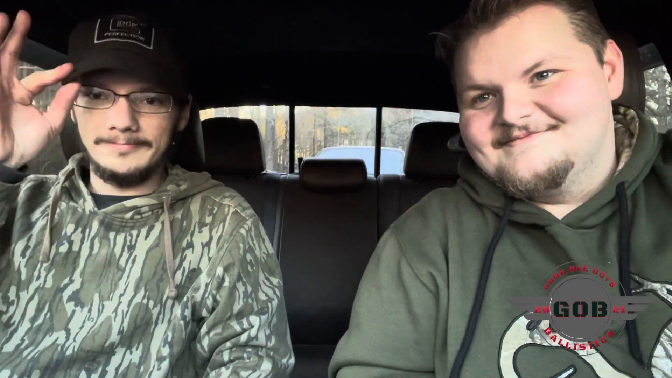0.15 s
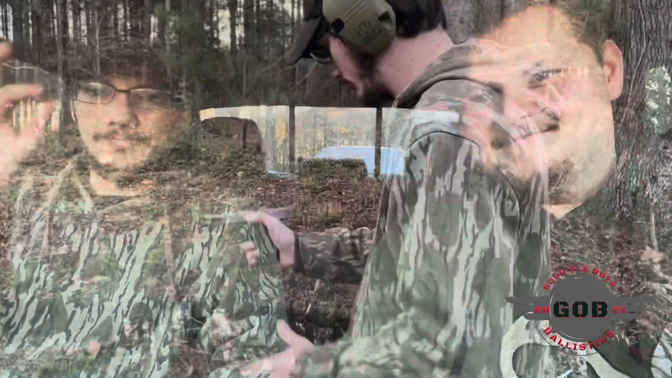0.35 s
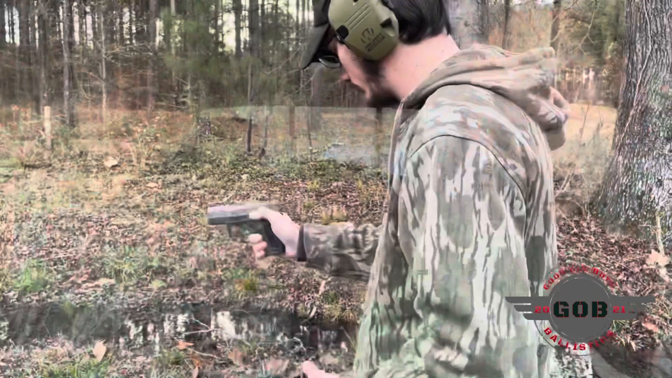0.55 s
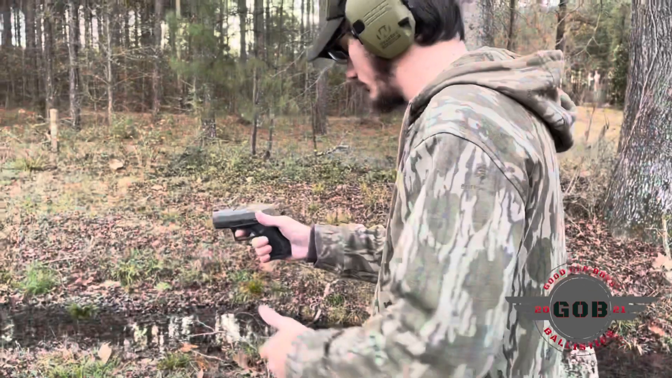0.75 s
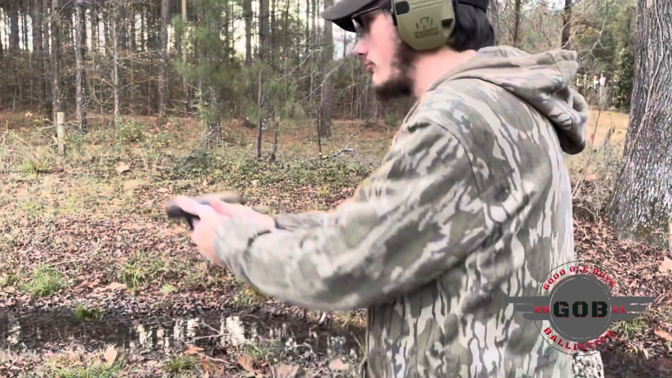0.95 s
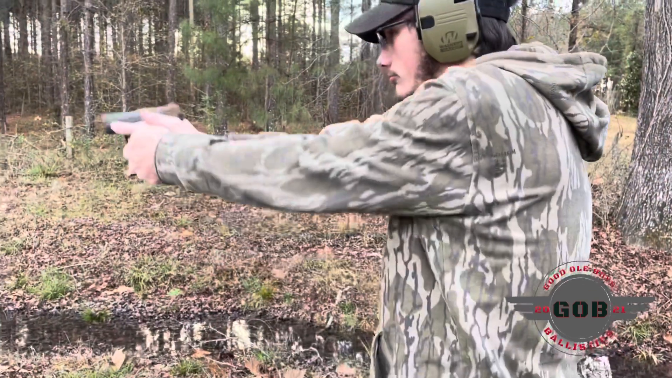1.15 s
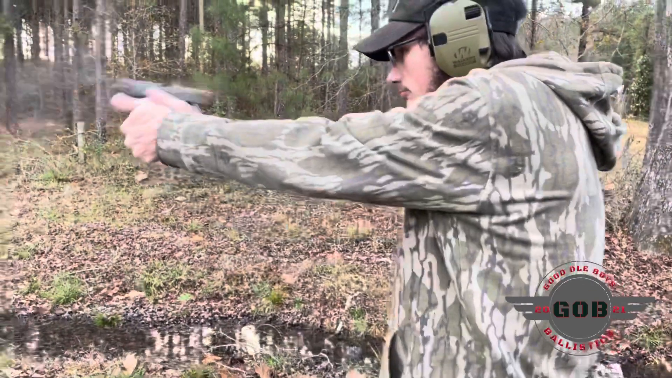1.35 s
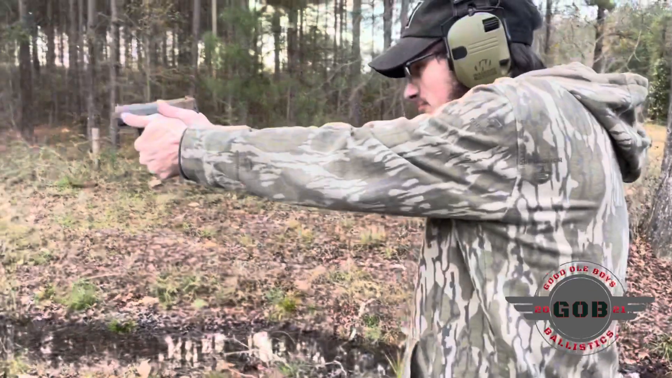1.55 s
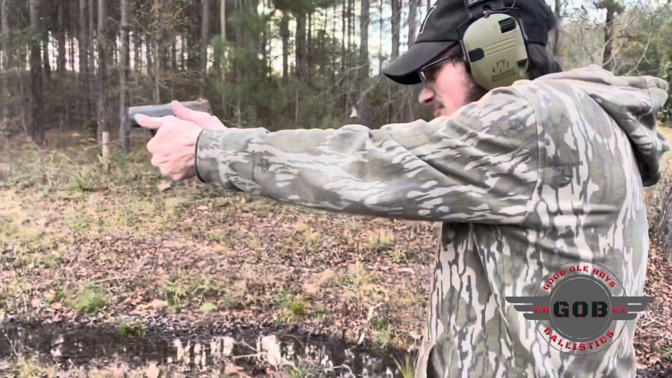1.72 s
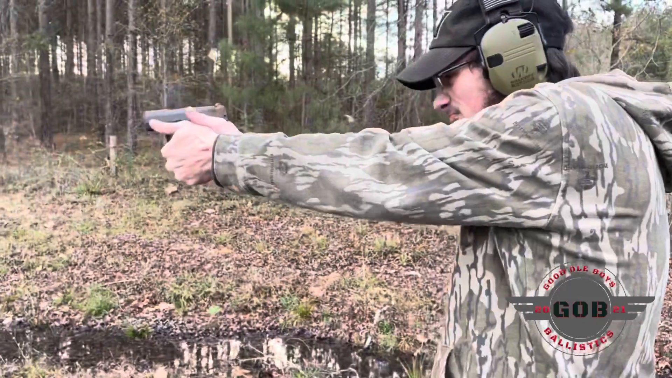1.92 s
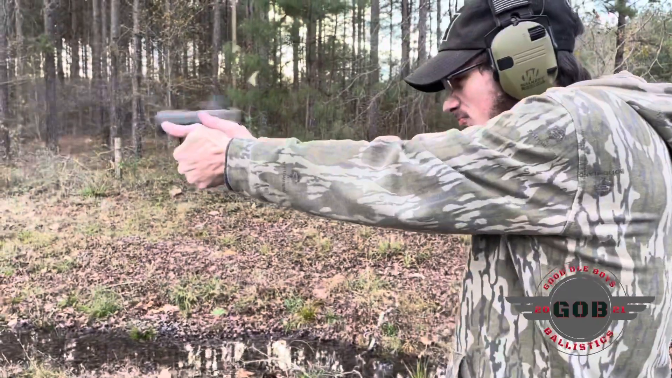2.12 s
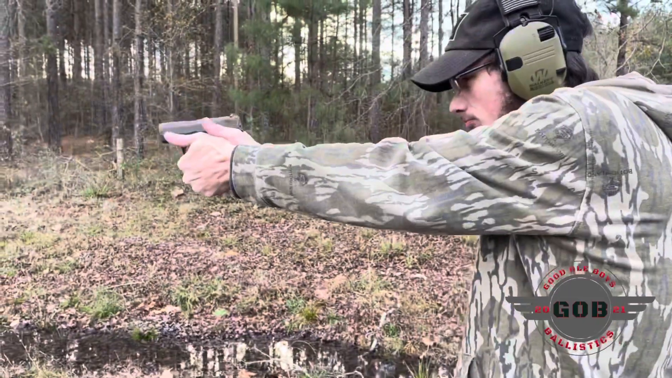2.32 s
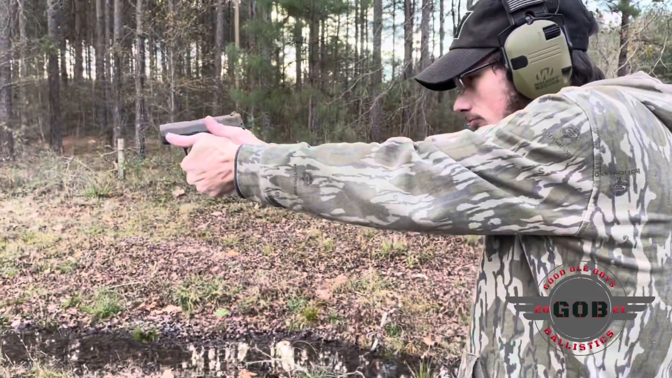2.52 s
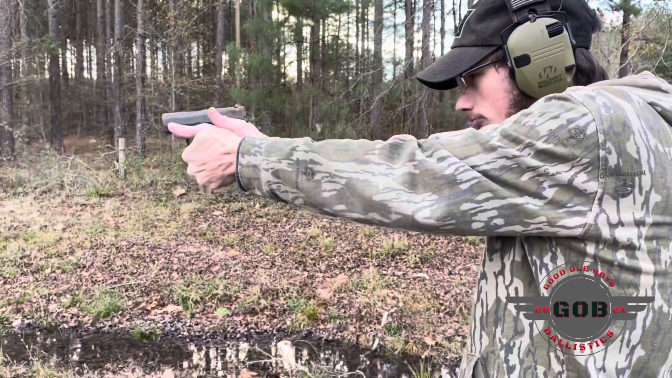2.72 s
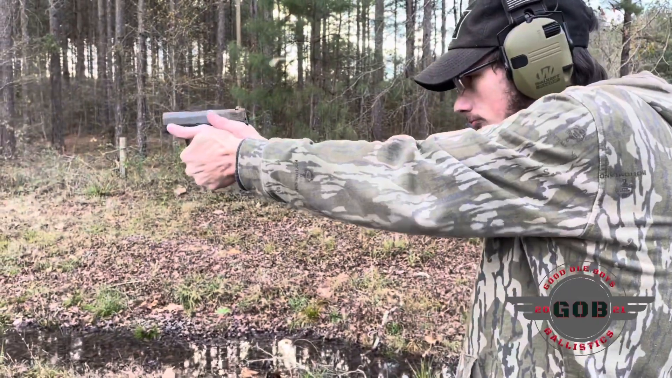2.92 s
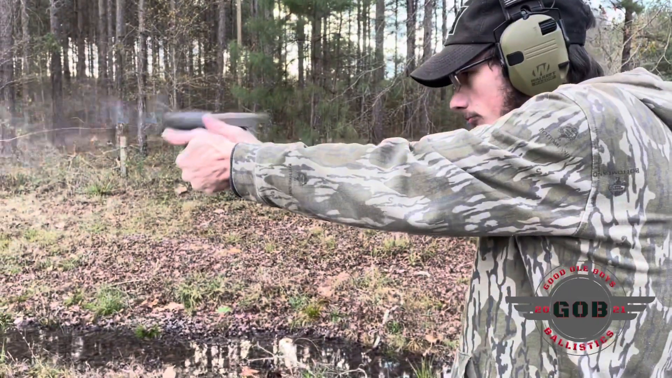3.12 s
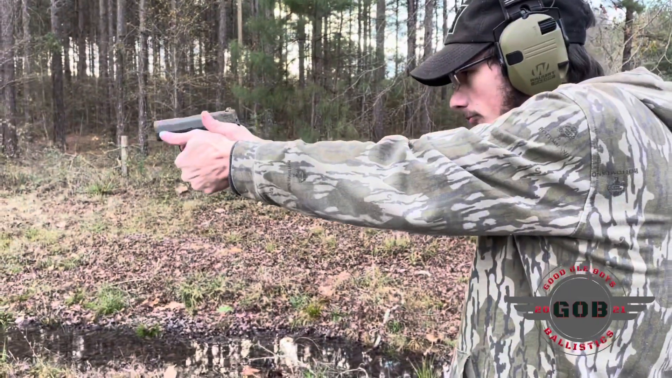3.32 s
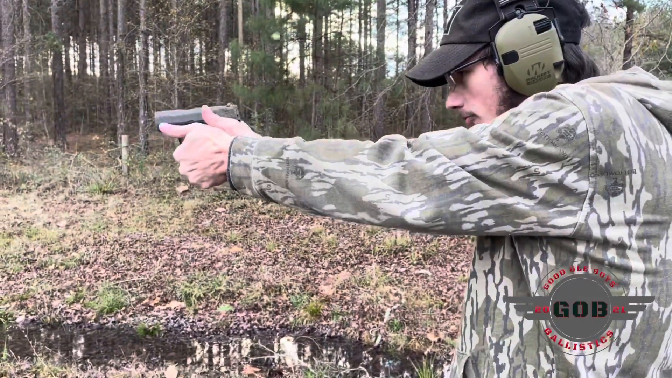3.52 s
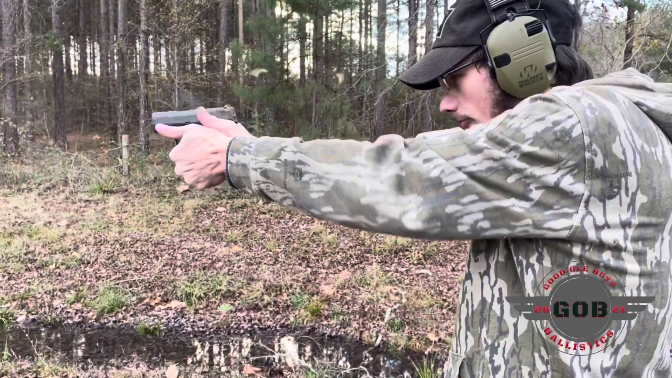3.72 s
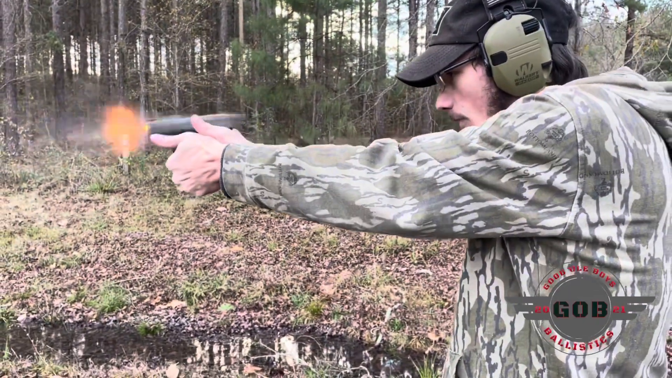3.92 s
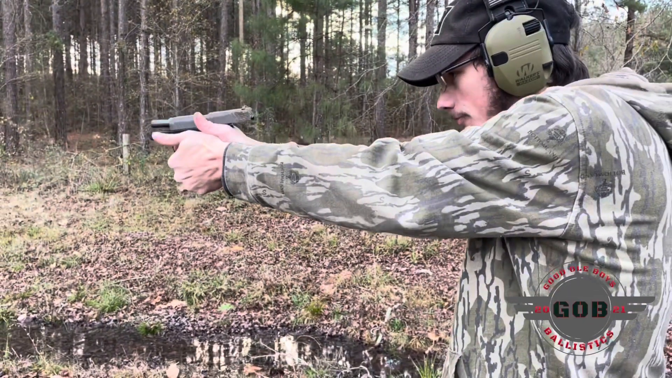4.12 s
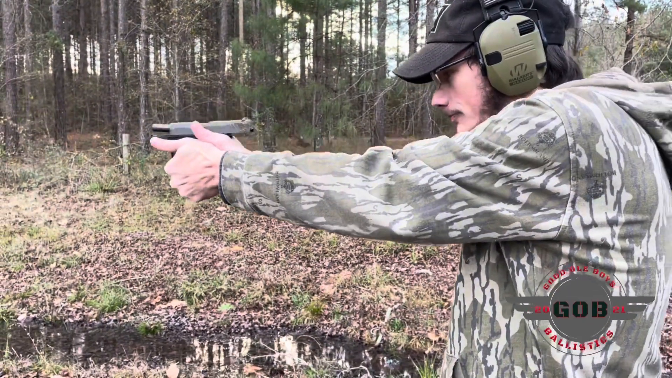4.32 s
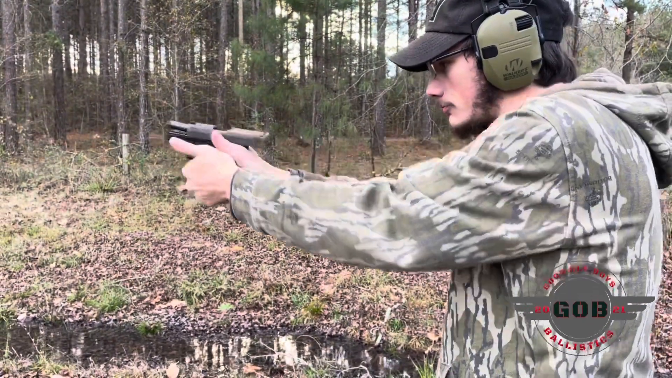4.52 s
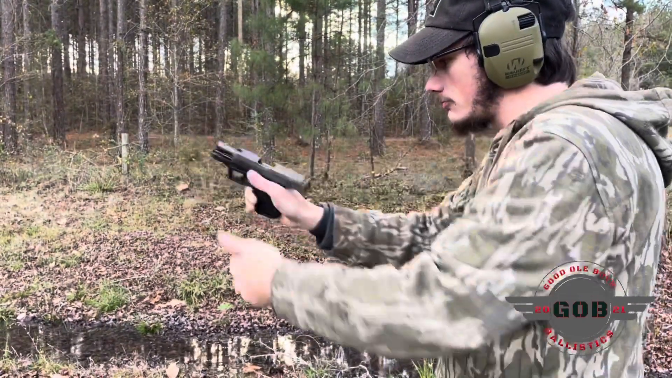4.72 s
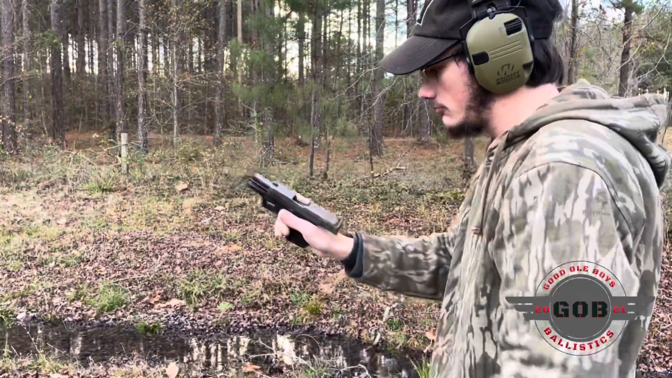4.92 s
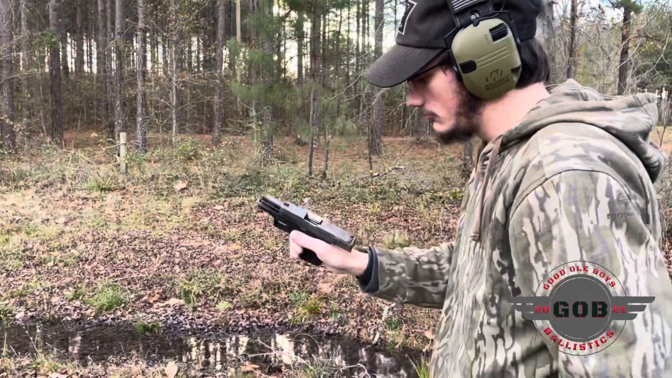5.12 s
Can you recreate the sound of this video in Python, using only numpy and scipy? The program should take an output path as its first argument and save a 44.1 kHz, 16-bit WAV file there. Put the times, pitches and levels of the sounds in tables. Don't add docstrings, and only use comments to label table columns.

```python
import sys
import numpy as np
from scipy import signal
from scipy.fft import rfft, irfft, next_fast_len
from scipy.io import wavfile
from scipy.ndimage import uniform_filter1d

SR = 44100
rng = np.random.default_rng(int(sys.argv[2]) if len(sys.argv) > 2 else 0)


def linear_from_db(decibels):
    return 10 ** (np.asarray(decibels, float) / 20)


def to_wav(s):
    ch = np.atleast_2d(s).T
    pcm = np.round(np.clip(ch, -1, 1) * 32767)
    wavfile.write(sys.argv[1], SR, pcm.astype(np.int16))


N = 227505

# frequency in Hz, level in dB per Hz.
CABIN_SPECTRUM = [(20, -17.5), (59, 2), (129, -7), (212, -15), (300, -19), (526, -27), (700, -38),
                  (1130, -31), (1800, -43.5), (2200, -60.5), (6000, -78), (9000, -110)]
CABIN_DB = -43
CABIN_LEVEL = [(.22, CABIN_DB), (.44, CABIN_DB - 5), (1.0, CABIN_DB - 57)]
# frequency in Hz, level in dB per Hz.
AIR_SPECTRUM = [(150, -32), (300, -2.5), (800, -5), (2300, -14), (3200, -12.5), (6400, -19.5), (11000, -22),
                (14000, -26.5), (16000, -49)]
AIR_DB = -65
AIR_LEVEL = [(0, AIR_DB - 19), (.38, AIR_DB - 12), (.58, AIR_DB), (1.33, AIR_DB), (4.15, AIR_DB - 17.5),
             (N / SR, AIR_DB - 27)]
# frequency in Hz, level in dB per Hz.
WIND_SPECTRUM = [(20, -27.5), (40, -3.5), (65, -1), (180, -14.5), (350, -16), (500, -23), (1000, -63.0)]
# time in seconds, level in dB.
WIND_LEVEL = [(.3, -70), (.55, -61), (.65, -61.5), (.78, -53), (.9, -55.5), (1.2, -53.5), (4.1, -57.5),
              (4.45, -72), (5.16, -80.5)]
# frequency in Hz, level in dB per Hz.
SLEEVE_SPECTRUM = [(500, -11.5), (1200, 5), (2600, 0), (3200, -27.5), (8000, -38.5)]
SLEEVE_S, SLEEVE_DB = .6, -63
SLEEVE_LEVEL = [(SLEEVE_S, SLEEVE_DB - 20), (SLEEVE_S + .17, SLEEVE_DB), (SLEEVE_S + .17 + .27, SLEEVE_DB + 0.5),
                (SLEEVE_S + .17 + .27 + .2, SLEEVE_DB - 23.5)]

# start in seconds, level in dB, brightest frequency in Hz.
TICKS = [(0.3417, -60, 1500), (0.4087, -62, 5900), (0.7019, -42.5, 5230), (0.8034, -54.5, 2220),
         (0.9368, -46.5, 1670), (1.0094, -51.5, 9000), (1.036, -38, 4060), (1.0524, -46.5, 2590),
         (1.1331, -45, 2810), (1.1538, -52.5, 3320), (1.2054, -45, 2550), (1.2446, -50, 10830),
         (1.285, -44.5, 5800), (1.294, -38, 2380), (4.5, -62, 1776), (4.7354, -56.5, 1965),
         (4.748, -57, 1750), (4.7618, -63.5, 1790)]
# start in seconds, level in dB, rattle decay in seconds.
RACK = [
    (0.4585, -14, 0.0047),
    (0.464, -21.5, .006),
    (0.4703, -18, 0.00048),
    (0.4708, -11.5, 0.004),
    (0.475, -9.5, 0.0025),
    (0.4799, -7, 0.0016),
    (0.484, -19, .005),
    (.492, -52.5, .006),
]
# frequency in Hz, level in dB per Hz.
RATTLE_SPECTRUM = [(400, -44), (1000, -15), (2600, -12), (4600, 2.5), (7000, -8.5), (10000, -1),
                   (13000, -17), (15600, -7.5), (16400, -43.5)]
# frequency in Hz, width in Hz, level in dB.
STEEL_MODES = [(2650, 150, -6), (3820, 200, -6), (4620, 150, 0), (9450, 300, -4)]

# time of the trough in seconds, level in dB.
PUFFS = [(1.095, -46), (1.154, -42.5), (1.213, -40.5), (1.276, -39), (1.56, -29.5), (1.576, -35.5),
         (1.788, -34), (1.817, -30.5), (1.968, -22.5), (2.305, -31), (2.329, -35), (2.576, -41),
         (2.855, -42), (4.189, -45.5)]
# let-go time in seconds, let-go level in dB, kick level in dB, kick
# frequency in Hz, settle level in dB.
SWINGS = [(1.403, -26, -15, 86.4, -34), (1.653, -20.5, -10, 148, -40.5), (1.912, -22, -11, 100, -36),
          (2.146, -24.5, -10.5, 128.5, -34), (2.405, -24.5, -19.5, 125, -40.5),
          (2.634, -21, -5.5, 164.2, -41.5), (2.921, -27.5, -8, 138.2, -29), (3.175, -19, -22, 133, -16.5),
          (3.463, -18.5, -9, 153, -24), (3.719, -24.5, -11.5, 138.9, -35.5), (3.977, -18, -11, 102, -24)]
# start in seconds, length in seconds, level in dB.
FORESHADOWS = [
    (1.323, .024, -33.5),
    (1.3455, .013, -10.5),
    (1.589, 0.0068, -22),
    (1.843, 0.0095, -24.5),
    (2.073, 0.0077, -29.5),
]
# frequency in Hz, level in dB per Hz.
FORESHADOW_SPECTRUM = [(200, -5), (550, 7), (1000, -12), (1500, -2), (2400, -8), (3300, -23), (4000, -3.5),
                       (5000, -8), (5400, -22), (5900, -14.5), (7500, -19.5), (9000, -59.5)]

# start in seconds, whoop in dB, lead-in rise in seconds, crack in dB, slide clack in dB.
SHOTS = [(1.3558, -3, 0.0084, -1, 0), (1.5988, 1, 0.0069, 1, -4), (1.8537, -2.5, 0.0074, 2.5, 4.5),
         (2.0925, -3.5, 0.0069, 1.5, 3), (2.353, -0.5, 0.0041, 2.5, 1.5), (2.5957, -1, 0.004, 2, 2),
         (2.8688, 0, 0.0029, 3, 0.5), (3.1297, -1, 0.0037, 2.5, 2), (3.4045, 0.5, 0.0029, 2, 1),
         (3.6731, -0.5, 0.0052, 2.5, -4), (3.9362, -1, 0.003, 3, -13)]
# frequency in Hz, level in dB per Hz.
CRACK_SPECTRUM = [(250, -13.5), (500, -2), (1350, -8.5), (2100, -12), (2550, -3.5), (3100, -14.5),
                  (4500, -13), (7000, -17.5), (11000, -21.5), (15000, -29), (16200, -27.5)]
# seconds after the shot, level in dB.
CRACK_LEVEL = [(0, -30), (.002, -7), (.0045, -23.5), (.008, -13), (.014, -21), (.024, -25), (.045, -34.5),
               (.09, -49.5)]
# frequency in Hz, level in dB per Hz.
LEAD_SPECTRUM = [(150, -12.5), (400, -6), (650, -2.0), (1100, -18.0), (5000, -18.5), (8000, -54)]
# frequency in Hz, level in dB per Hz.
CLACK_SPECTRUM = [(3000, -33.0), (7000, -7.0), (11000, -0.5), (15000, -7.5)]

# seconds after the shot, level in dB, left over right in dB.
TRUNKS = [
    (.023, -21, 3),
    (.0302, -12.5, 0),
    (.038, -16.5, -1),
    (.049, -26, 0),
    (.07, -27, 2),
    (.076, -29, -1),
    (.083, -27, 0),
    (.105, -29, -2),
    (.126, -31, 1),
    (.157, -32, -2),
]
# frequency in Hz, level in dB per Hz.
WOOD_SPECTRUM = [(40, -17.5), (150, -4.5), (320, -8.5), (480, -5.5), (980, -1.5), (1500, -10), (2100, -7.5),
                 (3350, -13), (4300, -11.5), (7000, -17.5), (11000, -24.5), (15000, -33.5), (16500, -70.5)]
# frequency in Hz, time to fall 60 dB in seconds.
FAR_T60 = [(60, 0.23), (260, 1.4), (700, 1.22), (1840, 1.2), (4850, 0.66), (12000, 0.47)]
# frequency in Hz, time to fall 60 dB in seconds.
NEAR_T60 = [(60, 0.36), (700, 0.24), (4000, 0.11), (12000, 0.18)]
# frequency in Hz, level in dB per Hz.
TREE_LINE_SPECTRUM = [(45, -21), (130, -6), (290, -21.5), (550, -3.5), (900, 1), (1400, -12.5), (2300, -19),
                      (4200, -41.5)]

# frequency in Hz, likeness 0-1, right lead in radians, right over left in dB.
LOW_PORTS = [(0, .9, -.2, 0), (250, .75, -.6, 0), (650, .55, -1, -3.5), (1300, .35, -2, .5),
             (2200, .4, 0, 2.5), (4000, .45, 0, 0), (5700, .35, .2, -1), (7400, .6, 2, 0)]
# from in Hz, to in Hz, likeness 0-1.
LOCKED = [(7700, 8900, .998), (10600, 12900, .995), (13900, 15800, .996)]


def evened(x):
    return x / np.sqrt(np.mean(x ** 2) + 1e-20)


def read(points, hz):
    f, value = np.transpose(points)
    return np.interp(np.log(hz + 1), np.log(f + 1), value)


def coloured(x, points):
    n = x.shape[-1]
    gain = linear_from_db(read(points, np.fft.rfftfreq(n, 1 / SR)))
    return irfft(rfft(x) * gain, n)


def add(mix, s, sound):
    part = mix[..., round(s * SR):][..., :sound.shape[-1]]
    part += sound[..., :part.shape[-1]]


def hiss(points, level):
    slow = uniform_filter1d(uniform_filter1d(rng.standard_normal(N), 900), 900)
    level_db = np.interp(np.arange(N) / SR, *np.transpose(level)) + 0.5 * evened(slow)
    return evened(coloured(rng.standard_normal((2, N)), points)) * linear_from_db(level_db)


def cabin():
    return hiss(CABIN_SPECTRUM, CABIN_LEVEL)


def air():
    return hiss(AIR_SPECTRUM, AIR_LEVEL)


def wind():
    return hiss(WIND_SPECTRUM, WIND_LEVEL)


def ticks():
    t = np.arange(0, .03, 1 / SR)
    out = np.zeros((2, N))
    fade = np.exp(-t / 0.0025) + 0.086 * np.exp(-t / 0.006)
    for s, db, hz in TICKS:
        snap = coloured(rng.standard_normal((2, len(t))), [(600, -20), (hz, 0), (16000, -10)])
        add(out, s, linear_from_db(db - 5.5) * evened(snap) * fade)
    return out


def rack():
    t = np.arange(0, .4, 1 / SR)
    burst = np.zeros((2, N))
    wood_answer = .012 * np.exp(-t / .03) + .0025 * np.exp(-t / .15)
    for s, db, rattle_s in RACK:
        fade = np.exp(-t / rattle_s) + wood_answer
        add(burst, s, linear_from_db(db) * rng.standard_normal((2, len(t))) * fade)
    t = t[:SR // 20]
    ring = np.zeros(len(t))
    for hz, width, db in STEEL_MODES:
        ring += linear_from_db(db) * np.exp(-np.pi * width * t) * np.sin(2 * np.pi * hz * t)
    rung = signal.oaconvolve(burst, ring[None] / np.linalg.norm(ring), axes=1)[:, :N]
    return linear_from_db(2.5) * coloured(burst, RATTLE_SPECTRUM) + linear_from_db(-16.5) * rung


def sleeve():
    return hiss(SLEEVE_SPECTRUM, SLEEVE_LEVEL)


def thump(db, hz):
    cycles = np.arange(-.6, 6, hz / SR)
    turns = 0.32 * cycles + 0.86 * (1 - np.exp(-cycles / 0.94))
    swell = np.exp(-np.maximum(cycles, 0) / 1.12) * signal.windows.tukey(len(cycles), .12)
    return 0.591 / hz, -linear_from_db(db + 2.0) * swell * np.cos(2 * np.pi * turns)


def thumps():
    rows = [(s, db, 90) for s, db in PUFFS]
    for (s, *_), (let_go, go_db, kick_db, kick_hz, settle_db) in zip(SHOTS, SWINGS):
        rows.append((s + .01065, kick_db, kick_hz))
        rows.append((s + .028, settle_db, 84))
        rows.append((let_go, go_db, 76))
    low = np.zeros((2, N))
    for s, db, hz in rows:
        lead, swing = thump(db, hz)
        lag = rng.choice([-1, 1]) * .0006 * (db > -27)
        add(low[0], s - lead - lag, swing)
        add(low[1], s - lead + lag, swing)
    return low


def foreshadow(length, db):
    n = round(length * SR)
    noise = evened(coloured(rng.standard_normal((2, 2048)), FORESHADOW_SPECTRUM))
    return linear_from_db(db) * noise[:, :n] * signal.windows.tukey(n, .25)


def whoop():
    u = np.arange(-.008, .02, 1 / SR) - .0044
    hz = 190 + 400 * np.exp(-np.clip(u + 0.0017, -.003, 1) / 0.0036)
    turns = np.cumsum(hz) / SR
    turns -= np.interp(0, u, turns)
    swell = np.where(u < 0, np.exp(-(u / 0.0034) ** 2), np.exp(-u / 0.0047))
    return linear_from_db(-4.5) * swell * np.cos(2 * np.pi * turns)


def crack(rise_s, crack_db, clack_db):
    t = np.arange(-.03, .09, 1 / SR)
    noise = rng.standard_normal((3, 2, len(t)))

    body = linear_from_db(crack_db + np.interp(t, *np.transpose(CRACK_LEVEL)))
    onset = np.exp(np.minimum(t, 0) / .0004)
    sharp = evened(coloured(noise[0], CRACK_SPECTRUM)) * body * onset

    slope_s = np.where(t < 0, np.maximum(rise_s, .001), .002)
    swell = np.exp(-abs(t) / slope_s) * signal.windows.tukey(len(t), .1)
    lead = linear_from_db(-16) * evened(coloured(noise[1], LEAD_SPECTRUM)) * swell

    home_s = .0405
    fade = np.exp(-np.maximum(t - home_s, 0) / 0.0008) * (t > home_s)
    clack = linear_from_db(clack_db - 21) * evened(coloured(noise[2], CLACK_SPECTRUM)) * fade
    return sharp + lead + clack


def trunks():
    u = np.arange(-.003, .003, 1 / SR)
    out = np.zeros((2, SR // 4))
    for s, db, pan_db in TRUNKS:
        v = u / (1 + 4 * s)
        pulse = np.exp(-(v / .00045) ** 2) * np.sin(2 * np.pi * 1350 * v + .8)
        add(out, s - .003, pulse * linear_from_db([[db + pan_db / 2], [db - pan_db / 2]]))
    return out


def wood():
    n = 2 * SR
    hz, t, z = signal.stft(rng.standard_normal((2, n)), SR, nperseg=128)
    clumps = evened(uniform_filter1d(rng.standard_normal(z.shape[1:]), size=4, axis=0))
    clumps = evened(uniform_filter1d(clumps, size=4, axis=1))
    far = linear_from_db(-30 - 60 * t / read(FAR_T60, hz)[:, None])
    near = linear_from_db(-18 - 60 * t / read(NEAR_T60, hz)[:, None])
    tail = signal.istft(z * (far + near) * linear_from_db(2.2 * clumps), SR, nperseg=128)[1][:, :n]
    u = np.arange(n) / SR
    tail *= np.clip(u / 0.015, 0, 1)
    tree_line = evened(coloured(rng.standard_normal((2, n)), TREE_LINE_SPECTRUM))
    tree_line *= linear_from_db(-50.5 - 60 * u / 4.16) * np.clip(u / 0.6, 0, 1)
    return (coloured(tail, WOOD_SPECTRUM) * linear_from_db(15.5) + tree_line) * np.clip((2 - u) / 0.39, 0, 1)


def duck():
    t = np.arange(N) / SR
    down_db = np.zeros(N)
    for s, *_ in SHOTS:
        drop = np.clip((t - s + 0.016) / 0.0068, 0, 1)
        creep = np.exp(-np.maximum(t - s, 0) / 0.081)
        down_db = np.maximum(down_db, 9 * drop * creep)
    return linear_from_db(-down_db)


def port_rows():
    rows = list(LOW_PORTS)
    for k, (low, high, same) in enumerate(LOCKED, start=1):
        turn = k * np.pi
        rows += [(low, same, turn, 0), (high, same, turn, 0), (high + 600, .6, turn + 1.2, 0)]
    return rows


def ports(x, alike=0):
    f, same, turn, right_db = np.transpose(port_rows())
    n = next_fast_len(N + 8192)
    hz = np.fft.rfftfreq(n, 1 / SR)
    same = np.clip(np.interp(hz, f, same) + alike, 0, 1)
    a, b = rfft(x, n)
    half = linear_from_db(np.interp(hz, f, right_db) / 2)
    right = (same * a + np.sqrt(1 - same ** 2) * b) * np.exp(1j * np.interp(hz, f, turn))
    return irfft(np.array([a / half, right * half]), n)[:, :N]


def scene():
    scattered = cabin() + air() + wind() + sleeve()
    handled = ticks() + rack()
    low = thumps()
    for s, length, db in FORESHADOWS:
        add(scattered, s, foreshadow(length, db))

    near, echo, cracks = np.zeros((3, 2, N))
    blast, returns, tail = whoop(), trunks(), wood()
    for s, db, rise_s, crack_db, clack_db in SHOTS:
        add(near, s - .008, linear_from_db(db) * np.array([blast, blast]))
        add(cracks, s - .03, crack(rise_s, crack_db, clack_db))
        add(low, s, returns)
        add(echo, s, tail)
    scattered += echo * duck()
    return ports(scattered) + ports(near, 1) + ports(cracks + handled, -.012) + low


def band_limit(x):
    return signal.sosfilt(signal.butter(12, 16960, fs=SR, output="sos"), x)


def record(dry):
    clipped = dry / (1 + abs(dry / .9) ** 6) ** (1 / 6)
    edge = signal.firwin(301, 16200, window=("kaiser", 6), fs=SR)
    finished = signal.oaconvolve(clipped, edge[None], "same")
    return band_limit(finished)


dry = scene()
out = record(dry)
to_wav(out)
```